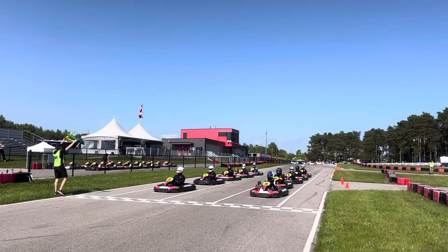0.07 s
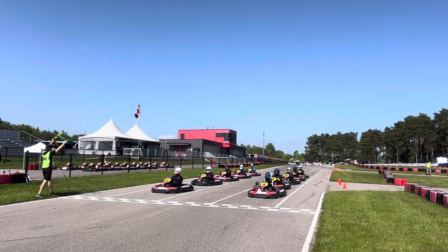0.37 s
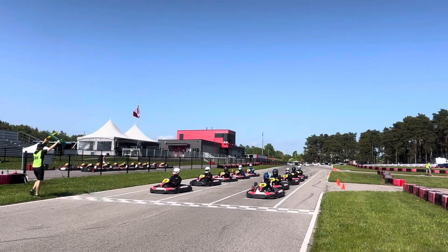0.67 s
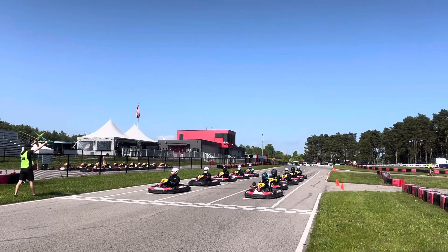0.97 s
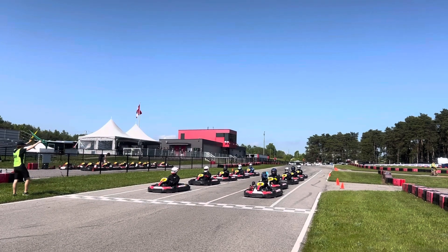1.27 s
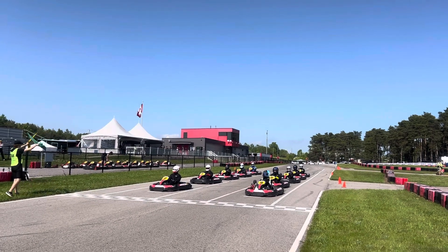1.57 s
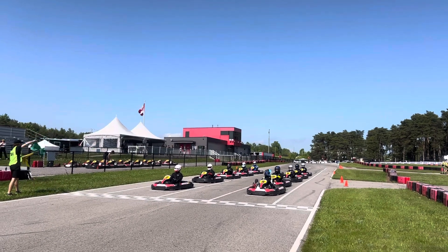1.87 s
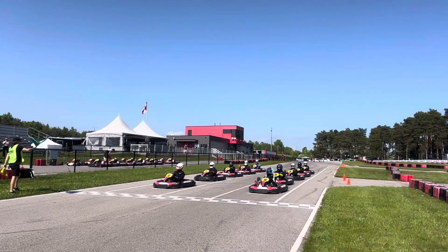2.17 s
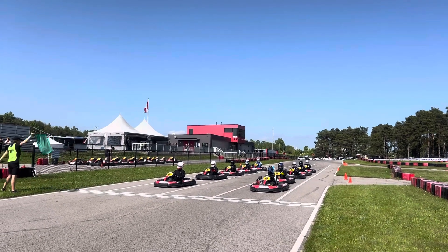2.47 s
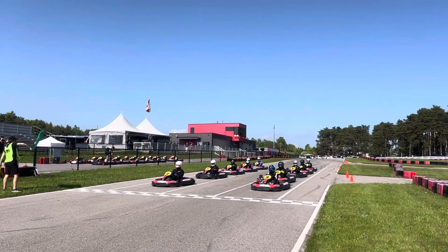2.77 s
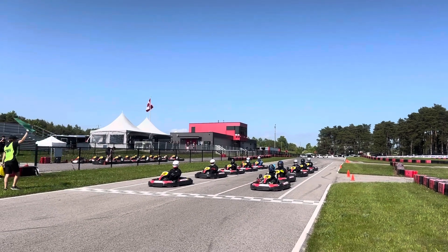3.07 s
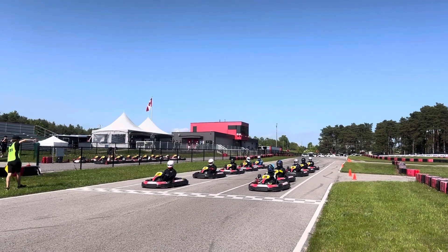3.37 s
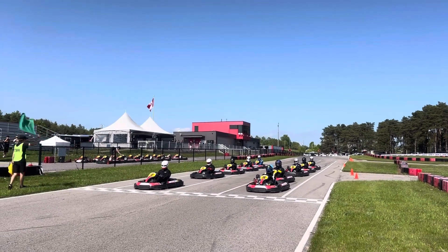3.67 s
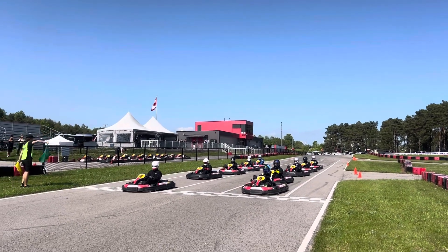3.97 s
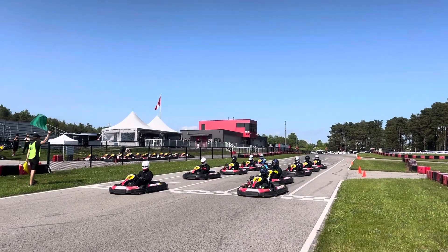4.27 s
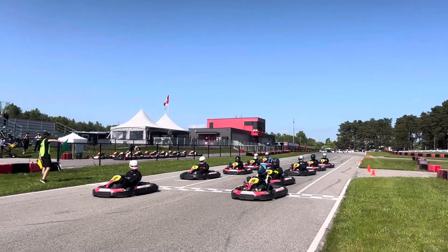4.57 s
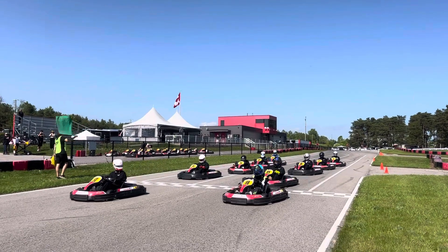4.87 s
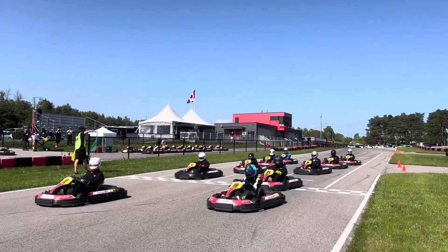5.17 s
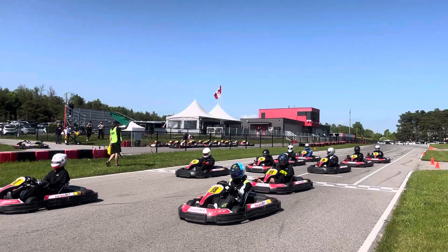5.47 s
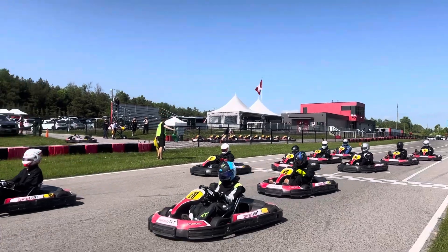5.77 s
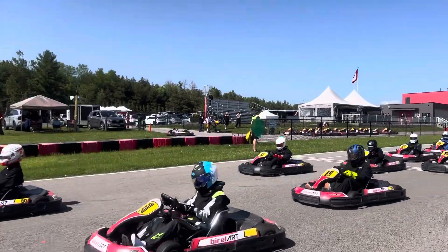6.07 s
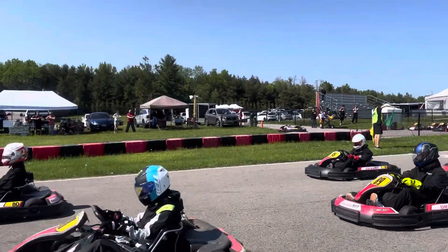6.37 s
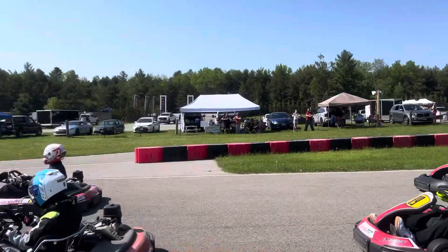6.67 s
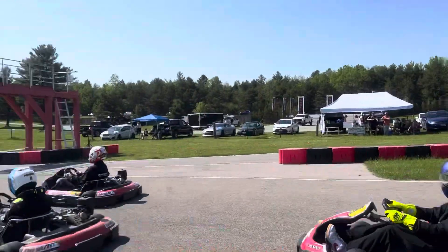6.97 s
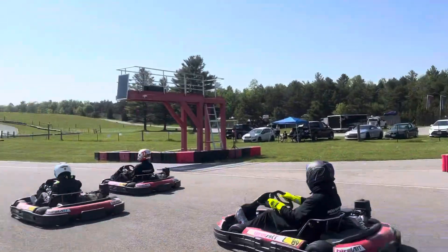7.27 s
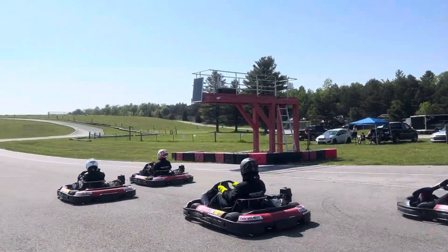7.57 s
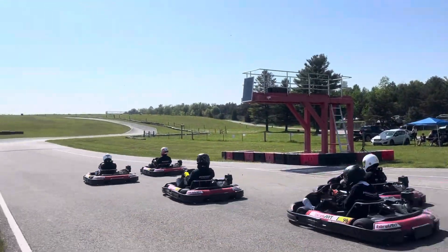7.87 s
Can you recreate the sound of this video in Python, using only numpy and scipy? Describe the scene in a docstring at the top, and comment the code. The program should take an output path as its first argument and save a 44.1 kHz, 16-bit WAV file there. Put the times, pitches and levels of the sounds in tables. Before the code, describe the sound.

A pack of go-karts idles with a low putter, then revs into a dense, droning roar and passes close by.

```python
"""A go-kart track, beside the starting grid: eight single-cylinder four-strokes idle, open up and drive past.
Each firing is a pressure pulse that thumps in the exhaust pipe, barks in the silencer and rasps as a jet.
Slipping clutches hold the engines at almost one speed. Two close karts, a leader and a chaser, stand out
with cracks, a drone and a crankshaft boom, while knocks ring the sheet-metal covers.
The sound reaches a pair of microphones, dark from the front and brighter from alongside."""
import sys
import numpy as np
from scipy import signal
from scipy.fft import rfft, irfft, next_fast_len
from scipy.io import wavfile
from scipy.ndimage import uniform_filter1d

SR = 44100
rng = np.random.default_rng(int(sys.argv[2]) if len(sys.argv) > 2 else 0)


def store_wav(level_fs):
    """Save 16-bit WAV to argv[1]."""
    pcm = np.round(np.clip(np.atleast_2d(level_fs), -1, 1) * 32767)
    wavfile.write(sys.argv[1], SR, pcm.T.astype(np.int16))


N = 357651
FFT_SIZE = next_fast_len(N + 8192, True)
T, HZ = np.arange(N) / SR, np.fft.rfftfreq(FFT_SIZE, 1 / SR)
FLAG_S = 2.096  # the throttles start to open

LEADER_BEAT_S, CHASER_BEAT_S = 5.7058, 7.4042  # the moment of one firing of each
LEADER_PATH, CHASER_PATH = (6.425, 2.27), (7.47, 2.95)  # pass_s, closest_m
# engine speed of the two close karts: time_s, firing_hz
LEADER_RATE = [(2.1, 16.27), (2.25, 20.82), (2.6, 22.89), (3, 24.26), (4.2, 25.59), (4.8, 26.46),
               (5.2, 25.83), (5.55, 26.63), (6.1, 26.9), (6.6, 26.66), (7, 26.1)]
CHASER_RATE = [(2.1, 17.9), (2.4, 22.5), (3.1, 25.45), (4, 26.2), (4.8, 26.68), (5.4, 27.2), (6.1, 27.88),
               (6.6, 27.68), (7.4, 26.92)]
# the other karts: throttle_s, idle_firing_hz, loaded_firing_hz, pass_s, closest_m
OTHER_KARTS = [(2.15, 19.6, 24.3, 7, 6.2), (2.25, 15.3, 27.4, 7.48, 3.9), (2.3, 22.4, 26.1, 8.64, 2.1),
               (2.2, 18.3, 24.4, 7.9, 4.84), (2.35, 27, 25.3, 7.94, 5.5), (2.499, 20.7, 36, 9.5, 4.0)]
def pack(creep_hz_per_s=.15, wander=.012, falloff=0.65, others_db=2.0, screen_db=-4.5, close_thump_db=-3):
    """Superposition: the engines add, weaker with distance; karts in front screen the others' treble."""
    karts = [(curve(LEADER_RATE), LEADER_BEAT_S, distance(*LEADER_PATH), True),
             (curve(CHASER_RATE), CHASER_BEAT_S, distance(*CHASER_PATH), True)]
    for go_s, idle_hz, loaded_hz, pass_s, lane_m in OTHER_KARTS:
        creep_hz = creep_hz_per_s * (np.maximum(T - go_s, 0) - 2)
        rate = spin_up(go_s, idle_hz, loaded_hz) + creep_hz
        karts.append((rate, rng.random(), distance(pass_s, lane_m), False))
    thumps = ticks = barks = rasps = hiss = cranks = 0
    for rate, beat_s, metres, close in karts:
        gain = metres ** -falloff
        if close:  # little scatter fills the gaps between near firings
            thump, tick, bark, rasp, crank = engine(rate, beat_s, 0, bark_floor=0.34, rasp_floor=0.12)
            thump = thump * amp(close_thump_db)
            bark, rasp = ground_reflection(bark, metres), ground_reflection(rasp, metres)
            cranks += gain * crank
            in_view = gain
        else:
            thump, tick, bark, rasp, _ = engine(rate, beat_s, wander, bark_floor=0.62, rasp_floor=0.3)
            gain = gain * amp(others_db)
            in_view = gain * amp(screen_db)
        thumps += gain * thump
        ticks += in_view ** 1.44 * tick
        barks += gain * bark
        rasps += in_view * rasp
        hiss += in_view ** 3.2 * rasp  # the steep falloff favours the nearest kart
    return thumps, ticks, barks, rasps, hiss, cranks


def engine(rate, beat_s, wander, bark_floor, rasp_floor, uneven_db=1.5, jitter_s=.0002,
           valve_s=0.0062, jet_s=0.0056, jet_lead_s=0.0049, tick_s=0.00065, tick_spread_db=5.5,
           scatter=0.48, scatter_s=0.039, thump_lead_s=0.004115):
    """Pulse-train excitation: each four-stroke cycle gives a thump, a valve tick and bursts of gas noise."""
    phase = cycles(rate * (1 + wander * drift(4)), beat_s)
    at = np.flatnonzero(np.diff(np.floor(phase)) > 0)
    force, late, tick_force, tick_late = rng.standard_normal((400, 4))[:len(at)].T
    at = np.clip(at + (late * jitter_s * SR).astype(int), 0, N - 1)
    tick_at = np.clip(at + (tick_late * .003 * SR).astype(int), 0, N - 1)
    firings, ticks = np.zeros((2, N))
    firings[at] = evened(amp(uneven_db * force))
    ticks[tick_at] = amp(tick_spread_db * tick_force)
    idle_floor = np.interp(T, [2.1, 2.5], [0.82, 0])
    t = np.arange(-2048, 2049) / SR
    play = lambda train, shape: signal.oaconvolve(train, shape, "same")
    valve = np.exp(-.5 * (t / valve_s) ** 2)  # gas escapes while the exhaust valve is open
    bark = (bark_floor + idle_floor + play(firings, valve)) * rng.standard_normal((2, N))
    bark[0] += 0.78 * play(firings, valve * rng.standard_normal(len(t)))  # alike in every firing
    # the jet hisses as soon as the valve cracks open and dies as the cylinder empties
    age = np.maximum(t + jet_lead_s, 0) / jet_s
    jet = 0.69 * np.sqrt(age) * np.exp(-.5 * age ** 2)
    valve_tick = 0.33 * (t >= 0) * np.exp(-abs(t) / tick_s)
    rasp_envelope = rasp_floor + 0.24 * idle_floor + play(firings, jet) + play(ticks, valve_tick)
    # the pressure pulse is followed by its scatter off the chassis and the track
    after = t + thump_lead_s
    pulse = (after > 0) * np.exp(-abs(after) / scatter_s) * rng.standard_normal(len(t))
    pulse *= scatter / np.linalg.norm(pulse)
    pulse[np.argmin(abs(after))] += 1
    rasp = rasp_envelope * rng.standard_normal((2, N))
    crank = np.sin(2 * np.pi * 2 * phase)  # two crankshaft turns to a firing
    return play(firings, pulse), ticks, bark, rasp, crank


def spin_up(go_s, idle_hz, loaded_hz, lag_s=.38):
    """First-order lag: the firing rate settles from idle to the speed at which the clutch holds it."""
    return loaded_hz + (idle_hz - loaded_hz) * np.exp(-np.maximum(T - go_s, 0) / lag_s)


def throttle(opening_s=0.52):
    """Quarter-sine ramp: the throttles ease from 0 to 1 when the flag drops."""
    return np.sin(np.pi / 2 * np.clip((T - FLAG_S) / opening_s, 0, 1))


# response of the exhaust pipe: frequency_hz, gain_db
PIPE_RESPONSE = [(25, -31.5), (45, -10), (60, -4.5), (108, -2), (134, 1.5), (160, 0.5), (188, 1.5),
                 (215, -2.5), (255, -6.5), (320, -18), (450, -21), (800, -34.5), (2000, -79)]
# loudness of the thumps: idle_db, load_lift_db, pass_lift_db, peak_s, approach_s, leave_s
THUMP_LEVEL = (-25.5, 6.5, 5, 6.5, 0.7, 1)
def exhaust_pipe(thumps, bass_db=9, bass_hz=68, honk_db=5.0, honk_hz=225, honk_s=0.63, echo_s=0.059):
    """Pipe resonance: pressure pulses ring the exhaust, rounder at idle and honking from alongside."""
    log_gain = np.log(amp(spectrum(PIPE_RESPONSE)))
    minimum_phase = -signal.hilbert(np.r_[log_gain, log_gain[-2:0:-1]]).imag[:len(HZ)]
    mid = colour(thumps, np.exp(log_gain + 1j * minimum_phase))
    idling = np.interp(T, [2.1, 3.1], [1, 0])
    rounder = colour(mid, amp(bass_db / (1 + ((HZ - bass_hz) / 42) ** 4)))
    mid = idling * rounder + (1 - idling) * mid
    honk = colour(mid, amp(honk_db / (1 + ((HZ - honk_hz) / 50) ** 4)))
    mid = mid + (honk - mid) / (1 + ((T - LEADER_PATH[0]) / honk_s) ** 4)  # the pipe mouth is in view
    # a late reflection off the barriers widens the sound a little
    side = amp(-16) * colour(mid, np.minimum(HZ / 150, 3) * np.exp(-2j * np.pi * HZ * echo_s))
    return levelled(np.array([mid + side, mid - side]), loudness(*THUMP_LEVEL))


# gas noise from the front and from alongside: frequency_hz, gain_db
GAS_AHEAD = [(120, -28), (280, 7.5), (420, 6.5), (600, 3), (780, -6.5), (1500, -13.5), (2200, -18),
             (3000, -25), (5000, -30.5), (6800, -30), (8200, -39), (11500, -31), (14000, -34.5)]
GAS_BESIDE = [(120, -12.5), (280, 3), (420, 3), (600, 1), (780, -5), (1500, -9), (2200, -11.5),
              (3200, -17.5), (6500, -22), (11500, -21.5), (14000, -26.5)]
# silencer resonances heard from the front: centre_hz, width_hz, lift_db
SILENCER_MODES = [(1044, 264, 10), (1434, 200, 10), (1856, 95, 10.5), (4170, 280, 1.5), (6670, 300, 0.5)]
# loudness of bark and rasp: idle_db, load_lift_db, pass_lift_db, peak_s, approach_s, leave_s
BARK_LEVEL = (-38, 10, 8.5, 6, 1.34, 2.5)
RASP_LEVEL = (-50.5, 11.5, 11, 8, 2, 16)
def gas_noise(bark, rasp, turn_s=(4.9, 6.0), split_hz=2400, top_hz=8500):
    """Directivity: gas noise is coloured by the silencers from the front, open and bright from alongside."""
    beside = np.interp(T, turn_s, [0, 1])
    lift_db = sum(db / (1 + (2 * (HZ - hz) / width) ** 2) for hz, width, db in SILENCER_MODES)
    ahead_gain, beside_gain = amp(spectrum(GAS_AHEAD) + lift_db), amp(spectrum(GAS_BESIDE))
    low_band = 1 / np.sqrt(1 + (HZ / split_hz) ** 8)
    high_band = np.sqrt(1 - low_band ** 2) / np.hypot(1, (HZ / top_hz) ** 3)
    out = 0
    for source, band, level in (bark, low_band, BARK_LEVEL), (rasp, high_band, RASP_LEVEL):
        gas = microphone_pair(source)
        heard = (1 - beside) * colour(gas, band * ahead_gain) + beside * colour(gas, band * beside_gain)
        out += levelled(heard, loudness(*level))
    return out


# loudness of the close karts' cracks: time_s, level_db
LEADER_CRACKS = [(2.1, -39.5), (3.9, -37.5), (4.6, -37.5), (5.2, -37), (5.801, -30.5), (6.3, -28.5),
                 (6.65, -29.5), (7.2, -34), (8.1, -43)]
CHASER_CRACKS = [(4.6, -40.5), (6.6, -44), (7.25, -33), (8.1, -35)]
# colour of a crack from the front and from alongside: frequency_hz, gain_db
CRACK_AHEAD = [(300, -25), (560, 6), (780, -12), (1050, 9), (1240, -8), (1440, 2.5), (1650, -9),
               (1880, -2.5), (2100, -16.5), (3700, -17), (4200, -19.5), (4800, -30), (9000, -22)]
CRACK_BESIDE = [(300, -17), (800, 5.5), (1600, -1), (2300, -6), (3000, -5.5), (4200, -10.5), (7000, -11.5),
                (13000, -17)]
def cracks(rates, beat_s, levels, shield_gain, shield_hz=(4000, 5600), can_gain=3.6, can_hz=(1400, 2900),
           q=11, lead_s=0.0036, rise_s=0.0034, fall_s=0.0048, uneven_db=3.1, turn_s=(5.0, 5.9)):
    """Shock excitation: under load each firing's crack rings the silencer can and the heat shield."""
    t, out = np.arange(1400) / SR, np.zeros((2, N))
    envelope = (1 - np.exp(-t / rise_s)) * np.exp(-t / fall_s)
    ring = lambda gas, span_hz: signal.lfilter(*signal.iirpeak(rng.uniform(*span_hz), q, fs=SR), gas)
    phase = cycles(curve(rates), beat_s)
    for firing_s in T[1:][np.diff(np.floor(phase)) > 0]:
        gas = envelope * rng.standard_normal((2, len(t)))
        burst = evened(gas + can_gain * ring(gas, can_hz) + shield_gain * ring(gas, shield_hz))
        burst *= amp(uneven_db * rng.standard_normal())
        if firing_s > FLAG_S:
            add(out[0], firing_s - lead_s, burst[0])
            add(out[1], firing_s - lead_s, burst[1])
    stereo = microphone_pair(out)
    beside = np.interp(T, turn_s, [0, 1])
    heard = lambda response: evened(colour(stereo, amp(spectrum(response))))
    blend = np.sqrt(1 - beside) * heard(CRACK_AHEAD) + np.sqrt(beside) * heard(CRACK_BESIDE)
    return amp(curve(levels)) * blend


# harmonics that the pipe favours: firing_rate_multiple, gain_db
DRONE_HARMONICS = [(4, -10), (5, -1.5), (7, -3)]
# loudness of the close karts' drones: time_s, level_db
LEADER_DRONE = [(3, -28.5), (4.5, -25), (6.5, -15.5), (7.1, -25)]
CHASER_DRONE = [(3.6, -22), (4.15, -21), (5.8, -21), (7.3, -24)]
def drone(rates, beat_s, levels):
    """Harmonic series: periodic firing gives a close kart its pitched note."""
    phase = cycles(curve(rates), beat_s)
    note = sum(amp(db) * harmonic(phase, k) for k, db in DRONE_HARMONICS)
    return throttle() * amp(curve(levels)) * note


# loudness of the boom: time_s, level_db
BOOM_LEVEL = [(2.35, -48.5), (2.6, -28), (2.85, -31), (3.05, -22), (4.4, -22.5), (4.8, -16.5), (5.05, -30),
              (5.95, -16), (6.2, -20), (6.55, -15), (6.78, -25), (7.5, -27), (8, -19)]
def crankshaft_boom(cranks):
    """Beating: the two close engines drone at crankshaft speed, in swells that follow the table."""
    return throttle() * levelled(cranks[None], curve(BOOM_LEVEL), size=8000)


# a resonance that climbs as the leader comes by: time_s, centre_hz, level_db
HOWL_GLIDE = [(4.3, 250, -33), (5.7, 345, -26), (6.15, 405, -26), (6.6, 420, -30), (6.95, 500, -35),
              (7.6, 535, -35)]
def howl(width_hz=65):
    """Swept resonance: a gliding peak picks out the leader's higher harmonics in turn."""
    time_s, hz, db = np.transpose(HOWL_GLIDE)
    centre_hz, rate = np.interp(T, time_s, hz), curve(LEADER_RATE)
    phase = cycles(rate, LEADER_BEAT_S)
    note = sum(harmonic(phase, k) / (1 + (2 * (k * rate - centre_hz) / width_hz) ** 2)
               for k in range(8, 23))
    return throttle() * amp(np.interp(T, time_s, db)) * note


# heavy firings at idle: start_s, level_db
IDLE_THUDS = [(0.283, -15), (0.836, -26), (1.162, -11.5), (1.204, -15), (1.572, -22)]
# pops as the throttles open: start_s, level_db, centre_hz, width_octaves, hiss_db
THROTTLE_POPS = [(2.111, -31, 1100, 1.0, -46), (2.171, -22, 590, 2.2, -46), (2.284, -25, 1050, 0.9, -55)]
def hard_firings(thud_hz=150, thud_s=0.0052, thud_trim_db=-4, pop_s=0.0022):
    """Damped transients: single heavy firings thud as a low tone or pop as a band of noise."""
    out, t = np.zeros(N), np.arange(3000) / SR
    swell = lambda rise_s: t / rise_s * np.exp(1 - t / rise_s)
    for start_s, db in IDLE_THUDS:
        add(out, start_s - .003, amp(db + thud_trim_db) * swell(thud_s) * np.sin(2 * np.pi * thud_hz * t))
    for start_s, db, hz, octaves, hiss_db in THROTTLE_POPS:
        noise = rng.standard_normal(len(t))
        band_hz = hz * 2 ** (octaves * np.array([-.5, .5]))
        body = evened(signal.lfilter(*signal.butter(2, band_hz, "band", fs=SR), noise))
        add(out, start_s - .002, swell(pop_s) * (amp(db) * body + amp(hiss_db) * noise))
    return out


# sheet metal of the engine covers and heat shields: pitch_hz, gain_db, t60_s
COVER_MODES = [(1401, 6, 0.049), (1708, 5, 0.045), (1870, 2, 0.11), (2190, 0, 0.064), (4060, -4, 0.035),
               (5330, -10, 0.035), (6400, -9, 0.03)]
# loudness of the clatter: idle_db, load_lift_db, pass_lift_db, peak_s, approach_s, leave_s
CLATTER_LEVEL = (-56.5, 11, 15, 7.5, 2, -0.5)
def cover_clatter(ticks, uneven_db=4, detune=0.035, covers=4):
    """Modal ringing: each knock excites a cover's modes unequally; no two covers are tuned alike."""
    t, out, at = np.arange(4000) / SR, np.zeros((2, N)), np.flatnonzero(ticks)
    for cover in range(covers):
        knocks = at[cover::covers]
        for hz, db, t60_s in COVER_MODES:
            spread_db = uneven_db * rng.standard_normal((1000, 2))[:len(knocks)].T
            blows = np.zeros((2, N))
            blows[:, knocks] = ticks[knocks] * amp(spread_db)
            tuned_hz = hz * (1 + detune * rng.uniform(-1.05, 1))
            ring = amp(db - 60 * t / t60_s) * np.sin(2 * np.pi * tuned_hz * t)
            out += signal.oaconvolve(blows, ring[None], axes=1)[:, :N]
    return levelled(out, loudness(*CLATTER_LEVEL))


# loudness of the intake: idle_db, load_lift_db, pass_lift_db, peak_s, approach_s, leave_s
INTAKE_LEVEL = (-66.5, 10.5, 21, 6.5, 1.92, 2.5)
def intake(hiss, from_hz=7600):
    """Flow noise: the nearest engine gulps air in bright bursts."""
    high_pass = 1 / np.sqrt(1 + (from_hz / (HZ + 1)) ** 12)
    air = colour(microphone_pair(hiss), 1j * high_pass * amp(spectrum(GAS_BESIDE)))
    return levelled(air, loudness(*INTAKE_LEVEL))


def singing_part(peak_s=6.48, width_s=0.17, pitch_hz=891, level_db=-28.5, waver=0.006):
    """Single-mode vibration: some part of the leader sings one brief, wavering note as it goes by."""
    envelope = amp(level_db) * np.exp(-((T - peak_s) / width_s) ** 2)
    hz = pitch_hz * (1 + waver * drift(25))
    return envelope * np.sin(2 * np.pi * np.cumsum(hz) / SR)


# small metallic tinks: start_s, level_db, pitch_hz
METAL_TINKS = [(3.011, -32, 4246), (3.285, -35.5, 6470), (3.399, -35, 11900), (6.42, -21.5, 4695)]
def tinks(decay_s=0.0057, detune=0.064):
    """Free vibration: loose metal rings briefly in clusters of four close modes."""
    out, t = np.zeros(N), np.arange(1200) / SR
    for start_s, db, hz in METAL_TINKS:
        ring = sum(np.sin(2 * np.pi * hz * (1 + detune * u) * t) for u in rng.uniform(-1, 1, size=4)) / 2
        add(out, start_s - .001, amp(db) * np.exp(-t / decay_s) * ring)
    return out


def distance(pass_s, lane_m, start_s=1.72, push_m_per_s2=1.41):
    """Uniform acceleration: metres to a kart that drives down the straight."""
    along_m = .5 * push_m_per_s2 * (np.maximum(T - start_s, 0) ** 2 - (pass_s - start_s) ** 2)
    return np.hypot(lane_m, along_m)


def ground_reflection(x, metres, engine_height_m=0.392, mic_height_m=1.446, bounce=0.39):
    """Comb filtering: the reflection off the track lags more as the kart nears, so the colour sweeps."""
    direct_m = np.hypot(metres, mic_height_m - engine_height_m)
    reflected_m = np.hypot(metres, mic_height_m + engine_height_m)
    late_s = (reflected_m - direct_m) / 343  # speed of sound in m/s
    return x + bounce * np.array([np.interp(T - late_s, T, channel) for channel in x])


# likeness of the two microphone signals: frequency_hz, coherence
MIC_COHERENCE = [(300, 0.99), (800, 0.49), (1700, 0.78), (2400, 0.2), (4000, 0.71), (6000, 0.28),
                 (8200, 0.92), (9400, 1), (10600, 0.93), (11700, 0.9), (13200, 0.62), (14300, .99),
                 (16000, 0.58)]
# their level difference: frequency_hz, left_minus_right_db
MIC_BALANCE = [(600, -1.1), (1800, 1.1), (3200, -4.5), (6000, -7), (7500, -3.5), (8500, 0)]
# their phase difference: frequency_hz, left_lead_rad
MIC_PHASE = [(300, 0), (2400, -.8), (4800, -.4), (5700, .5), (6800, 0), (8000, .6), (8900, 3), (10100, 3.3),
             (11200, 6.2), (12600, 6.4), (13800, 9.3), (15100, 9.5), (16000, 11.5)]
def microphone_pair(x):
    """Partial coherence: two unrelated signals become the partly alike sound at two microphones."""
    coherence = np.clip(spectrum(MIC_COHERENCE), -1, 1)
    right = colour(x[0], coherence) + colour(x[1], np.sqrt(1 - coherence ** 2))
    half = amp(spectrum(MIC_BALANCE) / 2) * np.exp(.5j * spectrum(MIC_PHASE))
    return np.array([colour(x[0], half), colour(right, 1 / half)])


def loudness(idle_db, load_db, pass_db, peak_s, approach_s, leave_s):
    """Pass-by envelope in dB: steady at idle, lifted by the throttle, swelling as the pack comes by."""
    away = (T - peak_s) / np.where(T < peak_s, approach_s, leave_s)
    return idle_db + throttle() * (load_db + pass_db / (1 + away ** 2))


def cycles(rate, beat_s):
    """Phase as the integral of rate: engine cycles counted from the firing at beat_s."""
    phase = np.cumsum(rate) / SR
    return phase - np.interp(beat_s, T, phase)


def harmonic(phase, k, waver_db=1.2):
    """Amplitude modulation: the k-th multiple of the firing rate wavers a little in level."""
    return np.sqrt(2) * amp(waver_db * drift(6)) * np.sin(2 * np.pi * (k * phase + rng.random()))


def amp(db):
    """Decibels to amplitude ratio."""
    return 10 ** (np.asarray(db) / 20)


def evened(x):
    """Normalisation to rms 1."""
    return x / np.sqrt(np.mean(x ** 2) + 1e-20)


def curve(rows):
    """Linear interpolation of a time table at every sample."""
    return np.interp(T, *np.transpose(rows))


def spectrum(rows):
    """Interpolation of a frequency table on a logarithmic axis."""
    hz, value = np.transpose(rows)
    return np.interp(np.log(HZ + 1), np.log(np.sort(hz)), value)


def colour(x, gain):
    """Filtering as multiplication by a gain at every frequency."""
    return irfft(rfft(x, FFT_SIZE) * gain, FFT_SIZE)[..., :N]


def drift(rate_hz):
    """Interpolated noise: a slow fluctuation of about unit size."""
    return np.interp(T * rate_hz, np.arange(512), rng.standard_normal(512))


def levelled(x, db, size=9000):
    """Gain control: the running rms of the channels' mean, smoothed over size samples, follows db."""
    power = uniform_filter1d(uniform_filter1d(x.mean(0) ** 2, size=size), size=size)
    return x * amp(db) / np.sqrt(abs(power) + 1e-12)


def add(mix, start_s, sound):
    """Superposition of a sound on the mix at start_s."""
    part = mix[max(round(start_s * SR), 0):][:len(sound)]
    part += sound[:len(part)]


def scene():
    """Linear mixing: the pack, with the two close karts standing out."""
    thumps, ticks, bark, rasp, hiss, cranks = pack()
    leader = cracks(LEADER_RATE, LEADER_BEAT_S, LEADER_CRACKS, shield_gain=0.5)
    leader += drone(LEADER_RATE, LEADER_BEAT_S, LEADER_DRONE) + howl() + singing_part()
    chaser = cracks(CHASER_RATE, CHASER_BEAT_S, CHASER_CRACKS, shield_gain=7.0)
    chaser += drone(CHASER_RATE, CHASER_BEAT_S, CHASER_DRONE)
    engines = exhaust_pipe(thumps) + gas_noise(bark, rasp) + intake(hiss) + crankshaft_boom(cranks)
    return engines + leader + chaser + cover_clatter(ticks) + hard_firings() + tinks()


def record(dry, ceiling=.97, cutoff_hz=15850):
    """Soft saturation rounds the peaks just under full scale; a low-pass filter then limits the band."""
    limited = dry / (1 + (dry / ceiling) ** 8) ** (1 / 8)
    low_pass = signal.firwin(511, cutoff_hz, window=("kaiser", 9), fs=SR)
    return signal.oaconvolve(limited, low_pass[None], "same")


dry = scene()
out = record(dry)
store_wav(out)
```